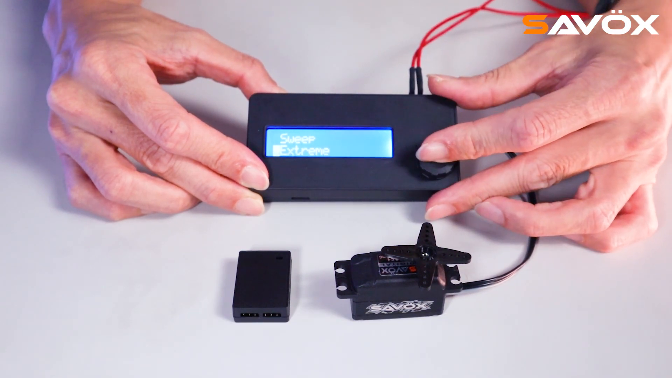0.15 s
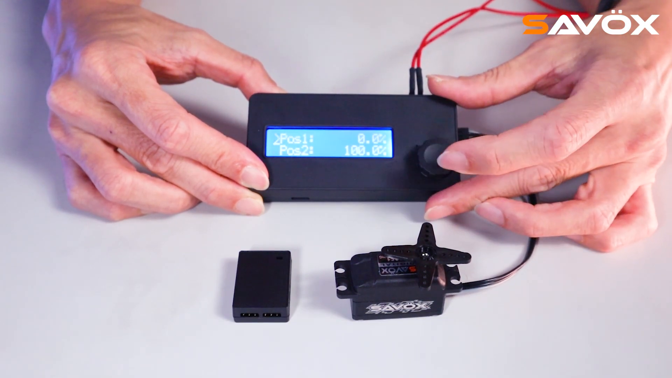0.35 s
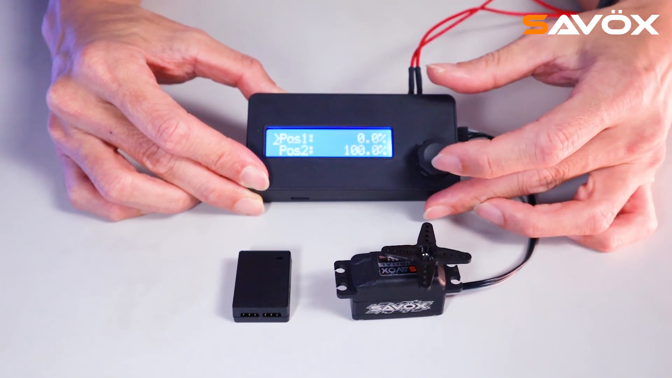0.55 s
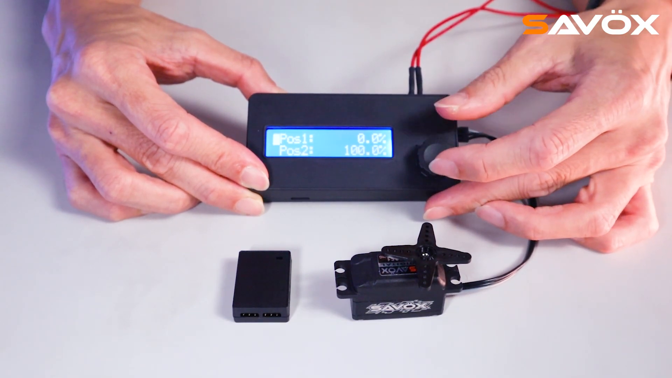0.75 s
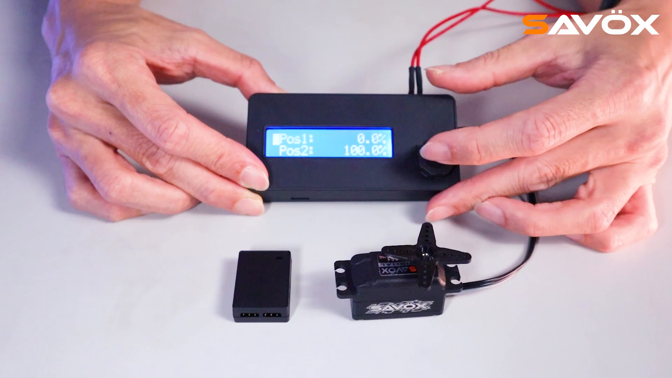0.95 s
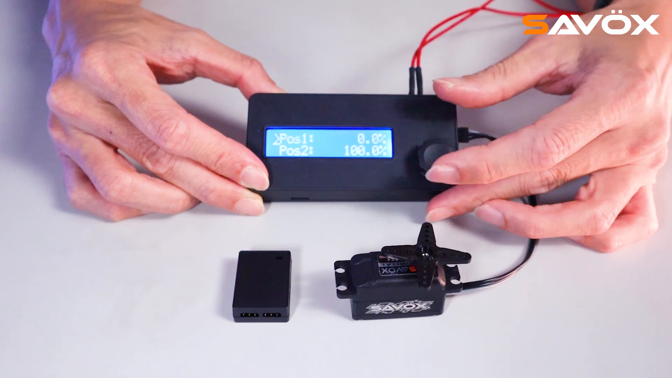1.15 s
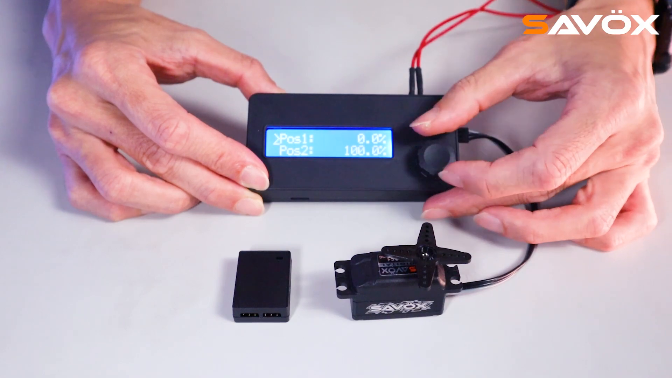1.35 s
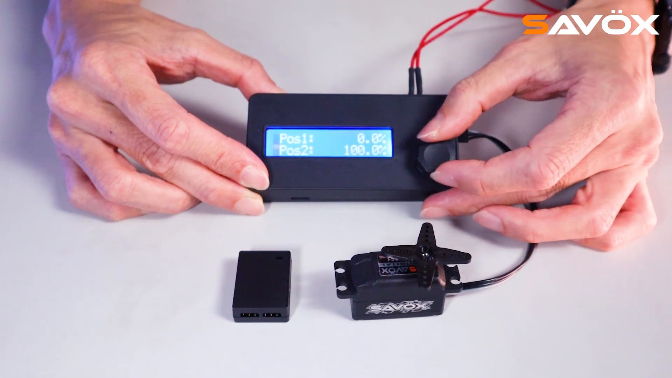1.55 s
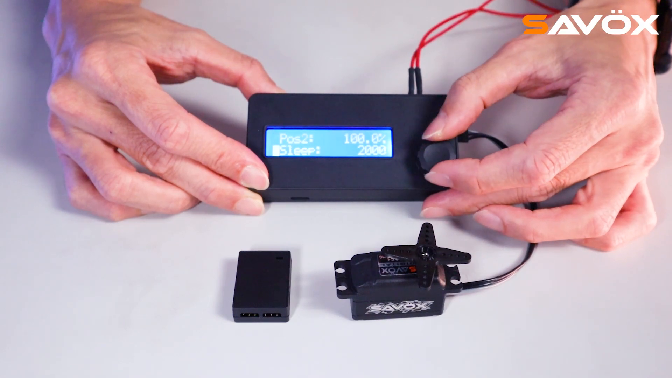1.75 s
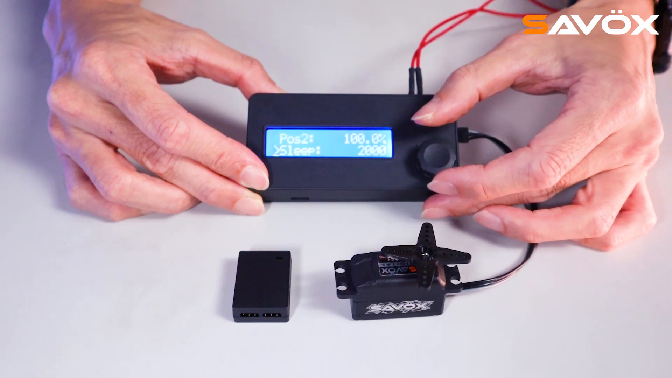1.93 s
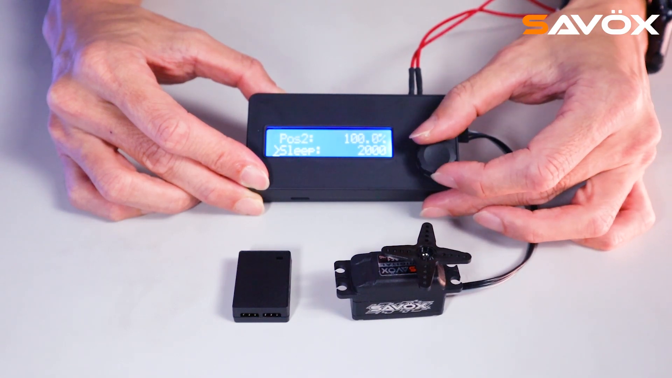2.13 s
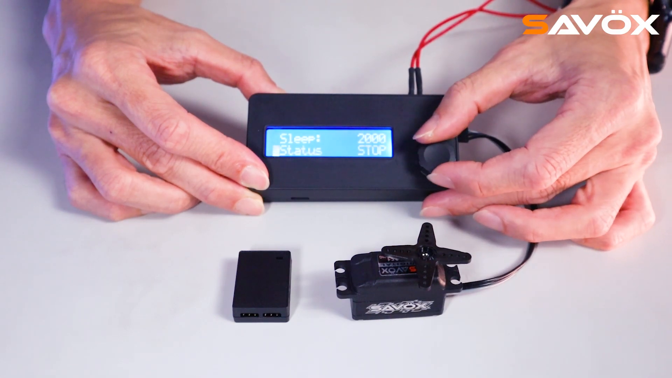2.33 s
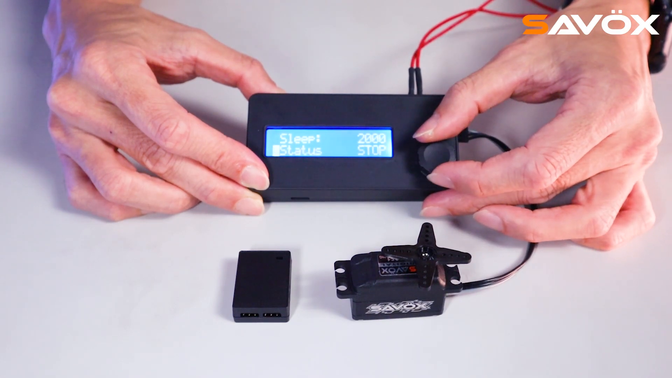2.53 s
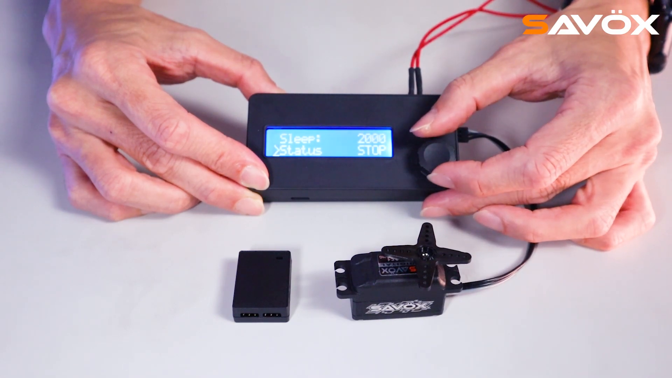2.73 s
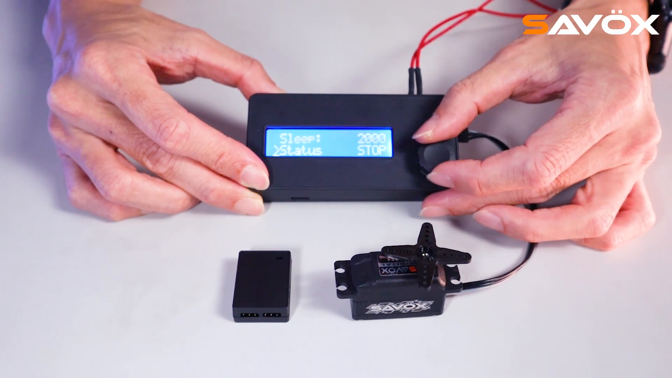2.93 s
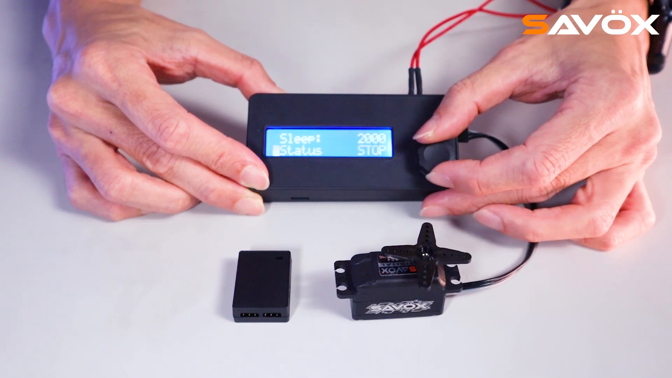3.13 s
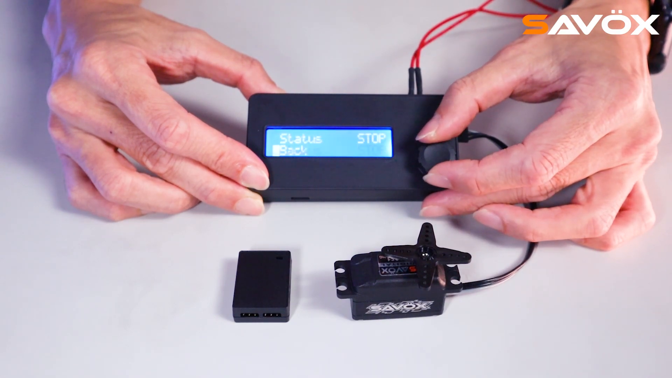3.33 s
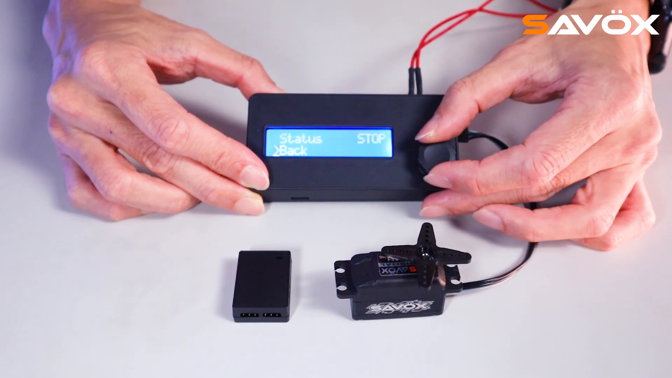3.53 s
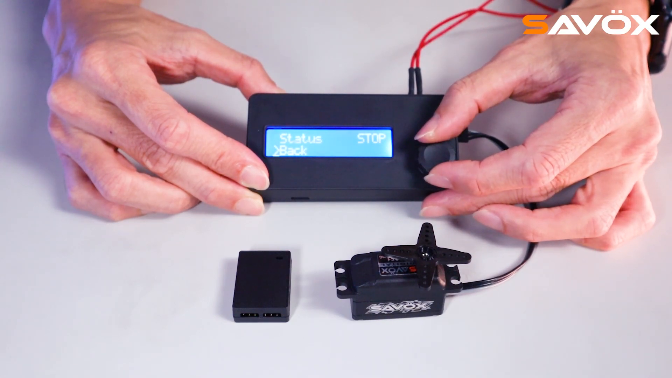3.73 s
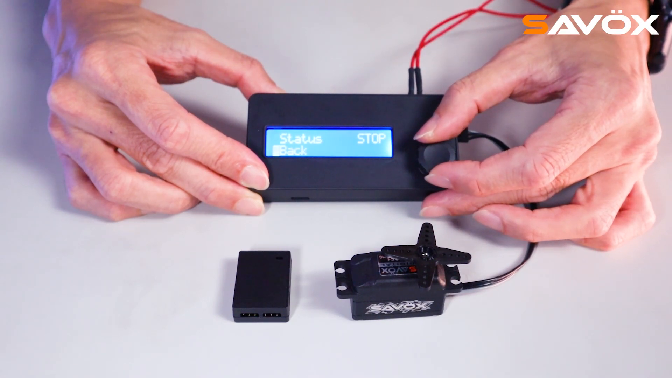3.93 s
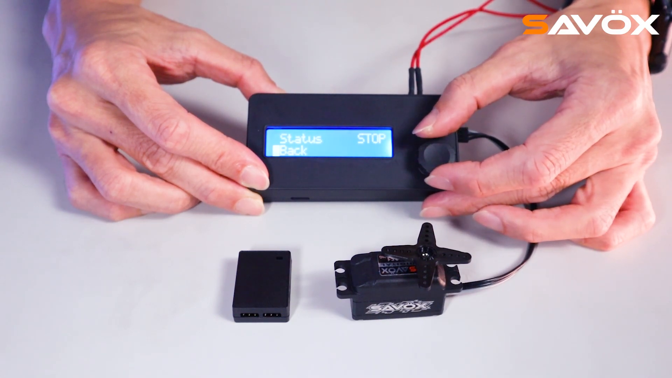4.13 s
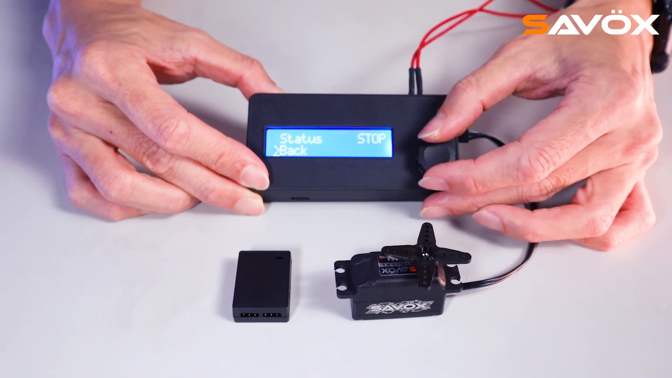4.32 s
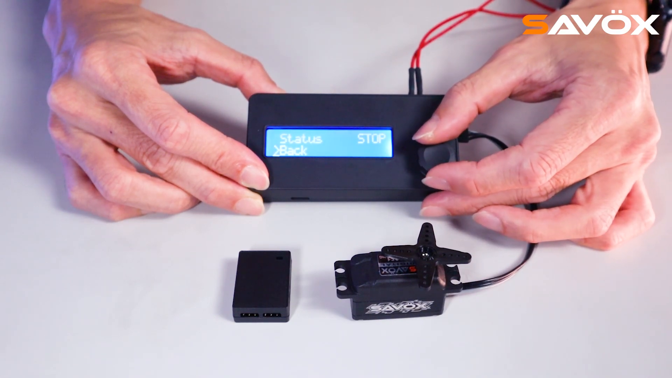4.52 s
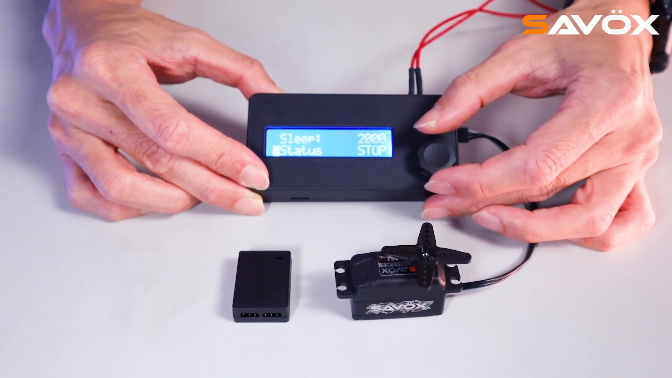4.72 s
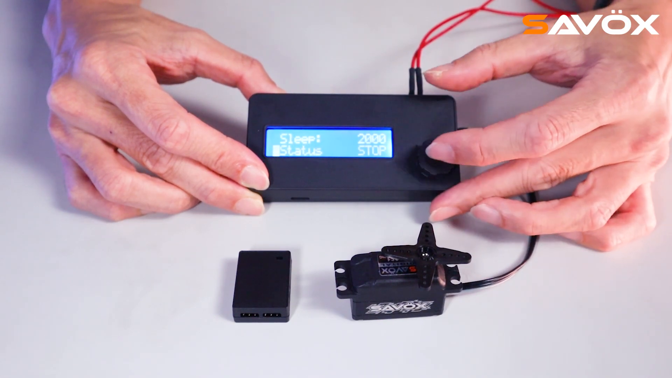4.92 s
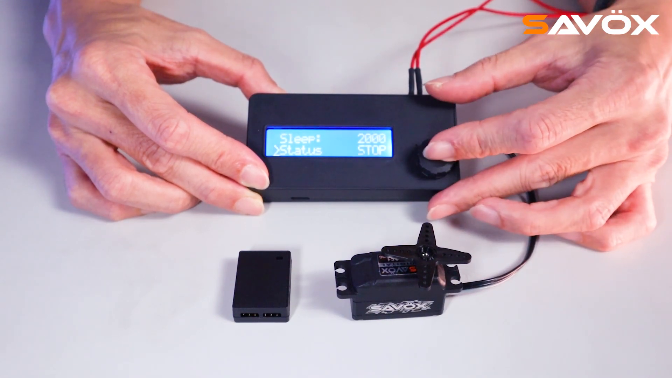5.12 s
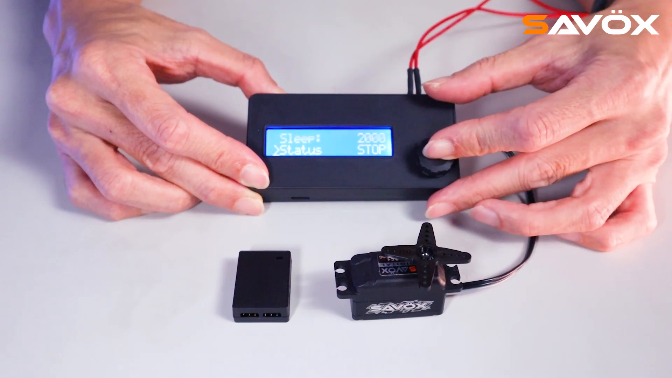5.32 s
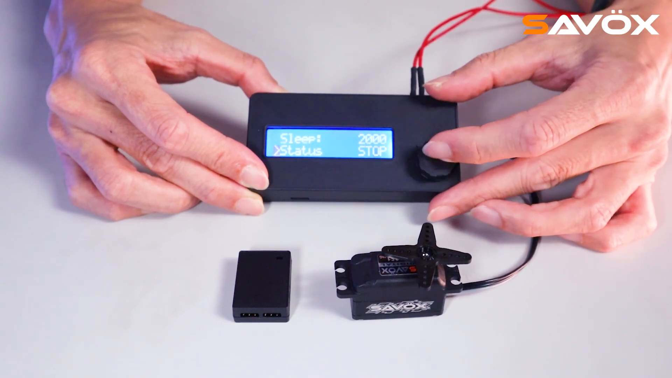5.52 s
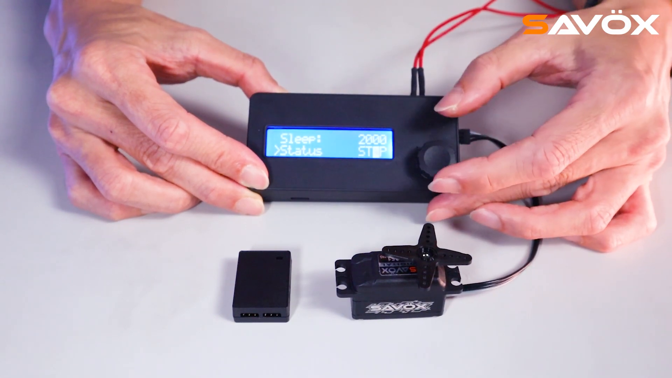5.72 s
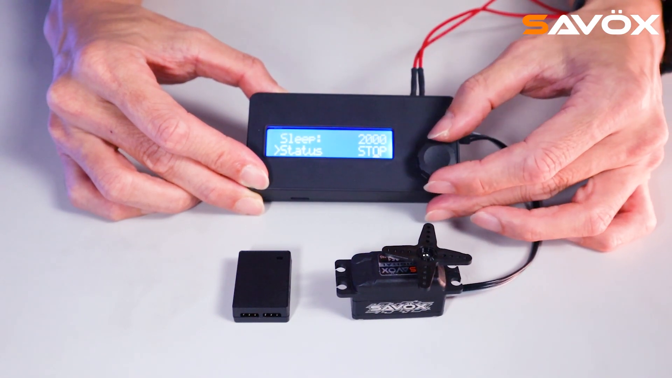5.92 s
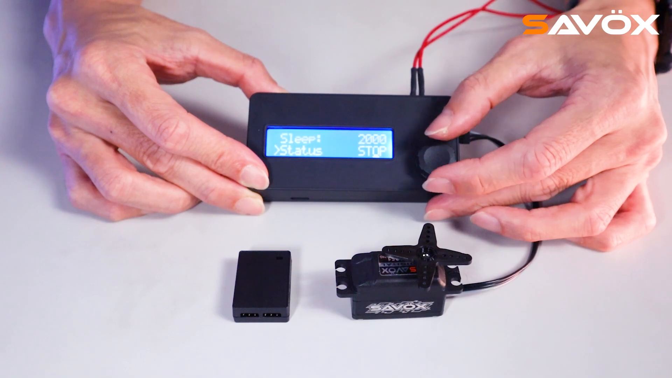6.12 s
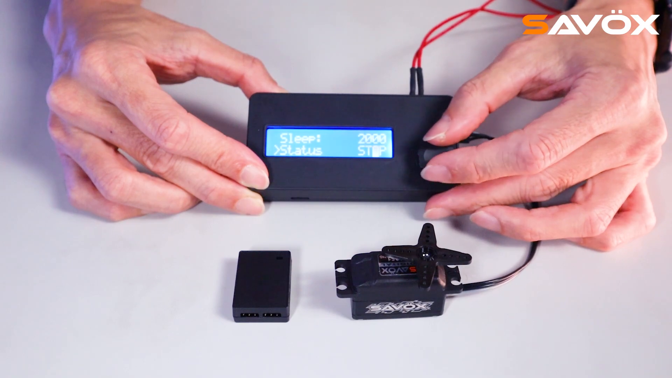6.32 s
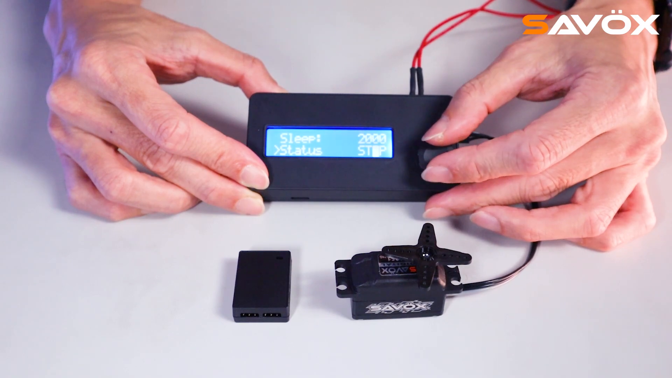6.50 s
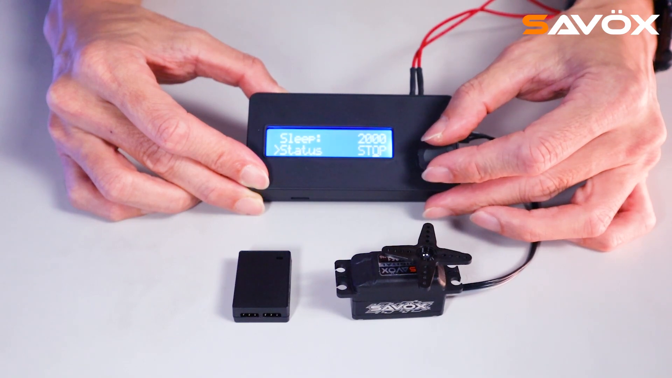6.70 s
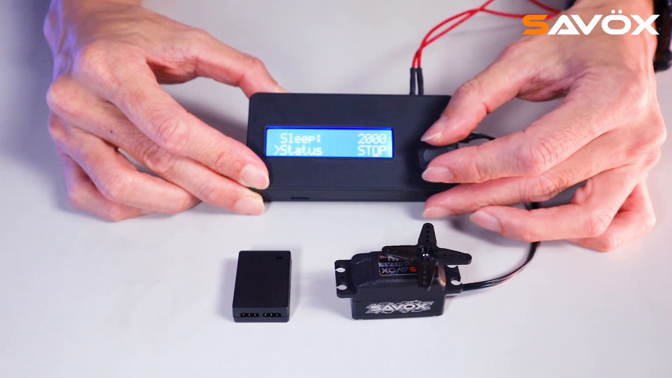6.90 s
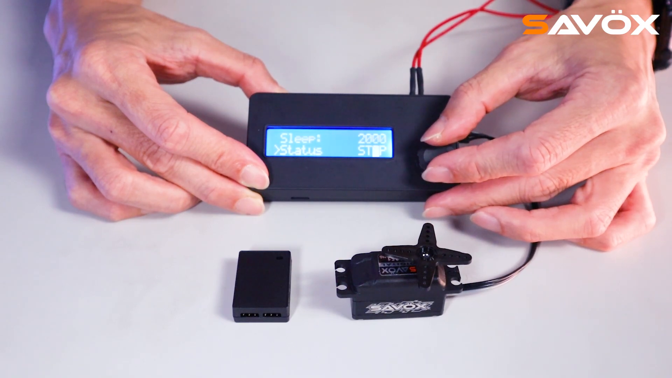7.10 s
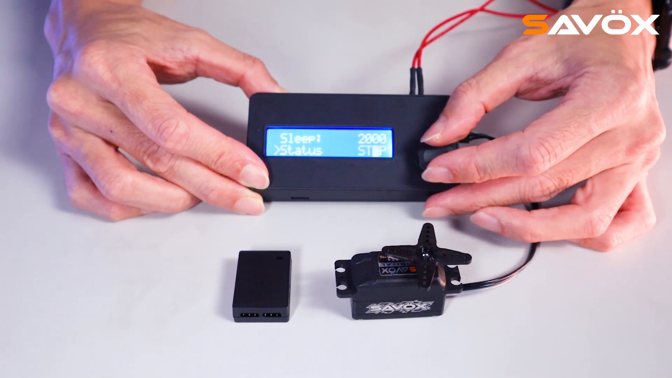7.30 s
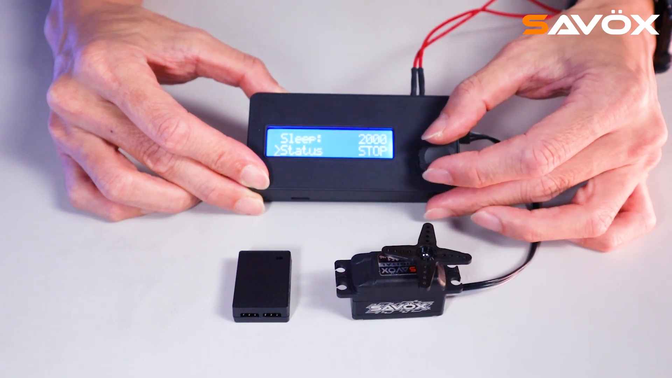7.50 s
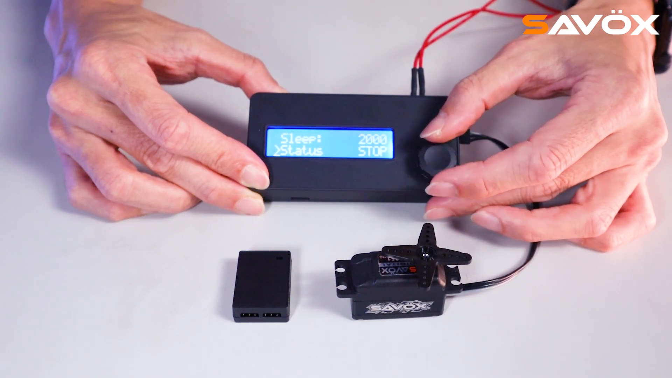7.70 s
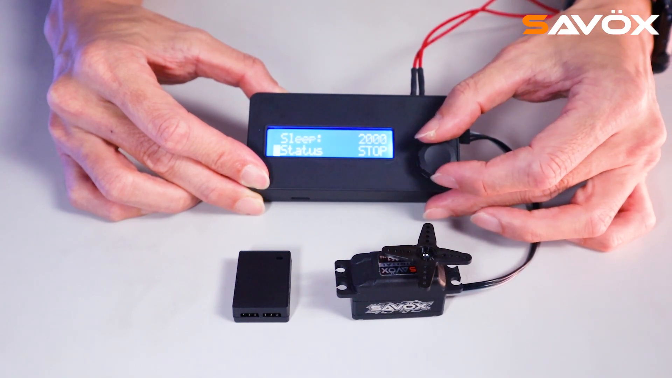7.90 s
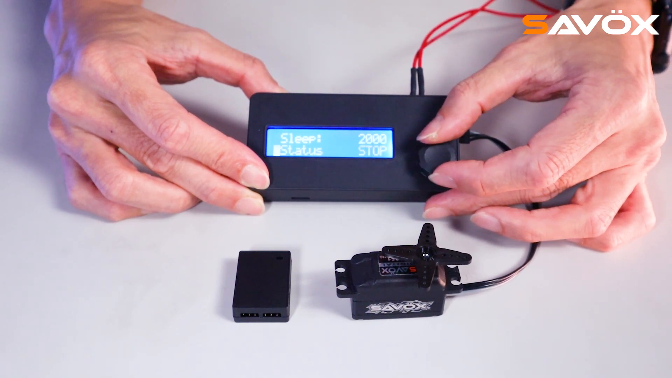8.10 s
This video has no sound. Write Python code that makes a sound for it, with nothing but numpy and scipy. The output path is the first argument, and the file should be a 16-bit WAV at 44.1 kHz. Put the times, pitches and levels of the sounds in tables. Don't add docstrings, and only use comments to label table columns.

```python
import sys
import numpy as np
from scipy import signal
from scipy.fft import rfft, irfft, next_fast_len
from scipy.io import wavfile
from scipy.ndimage import uniform_filter1d, map_coordinates

SR = 44100
rng = np.random.default_rng(int(sys.argv[2]) if len(sys.argv) > 2 else 0)


def to_wav(s):
    ch = np.atleast_2d(s).T
    pcm = np.round(np.clip(ch, -1, 1) * 32767)
    wavfile.write(sys.argv[1], SR, pcm.astype(np.int16))


def elevation(decibels):
    levels = np.asarray(decibels, float)
    return 10 ** (levels / 20)


N = 359415

# (frequency [Hz], density [dB per Hz])
HUM_SPECTRUM = [(12, -63), (20, -30.5), (54, -20), (63, -16), (80, -11), (113, -6), (185, -5), (251, -3),
                (289, -1), (327, -4), (348, -5), (381, -4.5), (431, -7.5), (552, -22.5), (800, -23),
                (1040, -56.5), (1760, -120)]
# (frequency [Hz], density [dB per Hz])
HISS_SPECTRUM = [(260, -31), (450, 0.5), (471, -8), (634, -15.5), (976, -11.5), (1100, -16.5),
                 (1620, -27.5), (2020, -31), (2460, -31), (2810, -42), (3310, -39.5), (4010, -42),
                 (5170, -46), (12750, -46.5), (12900, -61), (15800, -69.5)]
# (frequency [Hz], bandwidth [Hz], level [dB])
FAN_TONES = [(225.9, 11, -69.5), (296.3, 33, -62.5), (336.7, 6, -66.5), (357.1, 6.4, -59.5), (424, 16, -75),
             (937.6, 13, -86), (12500, 40, -113)]
# (peak time [s], length [s], level [dB])
DUCT_SURGES = [(.26, .1, -64.5), (.45, .08, -74), (.66, 0.054, -62), (.85, 0.088, -65.5),
               (1.254, .2, -63.5), (1.54, 0.11, -61.5), (1.803, 0.089, -67), (1.98, .07, -65),
               (2.137, 0.06, -60.5), (2.3, .2, -67), (2.6, .25, -68), (2.92, .22, -62), (3.18, 0.051, -66),
               (3.45, .08, -65), (3.7, .1, -62.5), (4.15, .08, -68), (4.5, 0.09, -69), (4.757, .1, -62),
               (4.997, 0.1, -62.5), (5.325, 0.043, -66), (5.537, 0.091, -66.5), (5.92, 0.13, -60),
               (6.124, .1, -60.5), (6.27, .06, -69), (7.17, .2, -59), (7.65, 0.19, -66.5),
               (7.99, .1, -61.5)]
# (frequency [Hz], ring [ms], press [dB], release [dB], detent [dB])
BOX_MODES = [(361.4, 6.2, -13, 2, -26), (584, 10, -27.5, -10, -27), (872.5, 11, -12, -1.5, -13),
             (1106, 6.9, -3, 3.5, 1.5), (1294, 12, -9, -9, -6.5), (1594, 9.4, -15.5, -12.5, -9.5),
             (1950, 8, -6, -14.5, -10), (2260, 6.5, -14, -21.5, -14), (2760, 3.9, -6.5, -6, -0.5),
             (3310, 11, -17.5, -17, -11.5), (3676, 6.4, -12, -7, -16), (4220, 4.9, -23.5, -25, -18),
             (4850, 4, -27.5, -23.5, -22), (5563, 4, -28, -21.5, -20.5)]
# (frequency [Hz], ring [ms], press [dB], release [dB], detent [dB])
CAP_MODES = [(6320, 4, -31, -17, -18), (7003, 4, -30.5, -24, -27), (7503, 4.6, -41, -34, -23.5),
             (8320, 6.3, -32, -26.5, -24), (9127, 3.6, -35.5, -41.5, -22), (9860, 5.2, -46.5, -29, -37.5),
             (10950, 4.6, -42.5, -39.5, -30.5), (11600, 2.8, -47, -46, -46.5), (12500, 3, -45.5, -47, -44),
             (13600, 3, -41.5, -47, -47), (14400, 3, -43.5, -46.5, -49), (15320, 3, -43, -51.5, -45)]
# (time [s], peak [dB], thump [dB], clack [dB], edge [dB])
PRESSES = [
    (0.078, -14, -25.5, -9, -12),
    (5.396, -19.5, -15, -4, -5.5),
    (7.3064, -17.5, -15.5, -7, -9),
]
# (time [s], peak [dB], thump [dB], clack [dB], edge [dB])
RELEASES = [
    (0.2652, -26.5, -25, -10.5, 8.5),
    (5.574, -30.5, -21.5, -18, -5),
    (7.5213, -31, -19.5, -17, -10),
]
# (time [s], peak [dB], clack [dB], edge [dB], tick [dB])
DETENT_STEPS = [(0.2962, -45, -8.5, 6.5, 0), (0.617, -56.5, -23, -16.5, -28.5),
                (1.472, -45.5, -31, -9, -23), (1.618, -42, -1.5, -4, -31.5), (1.718, -42, -2.5, -3.5, -24),
                (1.955, -58.5, -31, -9.5, -29), (2.311, -49.5, 4.5, -4, -20.5),
                (3.365, -39, -4.5, -7.5, -12), (3.49, -62, -27, -8, -21), (4.64, -62, -11.5, -12, -16.5),
                (5.063, -56, -15, -20, -35), (5.614, -38, -31.5, -18, -34)]
# (frequency [Hz], t60 [s], level [dB])
WALL_DECAY = [(60, .3, -30.5), (298.9, 0.29, 5), (790, .3, -2.5), (1200, 0.6, -7), (1700, 0.25, -5.5),
              (2800, .3, -11), (5500, 0.42, -9), (10000, .15, -10)]
# (delay [ms], level [dB])
NEAR_ECHOES = [
    (10, -24.5),
    (16.5, -25),
    (23, -29.5),
]
# (frequency [Hz], density [dB per Hz])
DRAG_SPECTRUM = [(700, -26), (1250, 3), (2100, -6), (3100, -2.5), (4400, -3.5), (5400, -12), (7000, -26.5),
                 (9000, -60)]
# (frequency [Hz], density [dB per Hz])
SWISH_SPECTRUM = [(3500, -38), (5000, -2.5), (5500, -2.5), (8000, -7), (11000, -18.5), (13000, -30.5),
                  (15000, -66)]
# (fastest time [s], speeding up [s], slowing down [s], drag [dB], swish over drag [dB])
FINGER_STROKES = [(.29, 0.021, .13, -74.5, -5.5), (1.5, 0.16, .1, -90, -6), (3.0, 0.17, 0.13, -87.5, -0.5),
                  (3.76, 0.16, 0.11, -74, -6.5), (4.5, 0.24, .2, -87, -7), (4.95, .08, 0.085, -84, -7),
                  (5.18, 0.1, 0.047, -84.5, -6), (5.579, 0.11, .12, -76, -9.5), (5.9, 0.22, 0.32, -82, -8),
                  (6.67, .14, 0.1, -84.5, -7.5), (7.26, 0.065, 0.088, -80, -8),
                  (7.41, 0.044, 0.12, -76, -13), (7.85, 0.35, .2, -84, -6)]
# (time [s], peak [dB], frequency [Hz])
FINGER_TAPS = [
    (0.923, -64, 940),
    (5.0637, -62, 1010),
    (5.651, -56, 1140),
    (5.7936, -54.5, 1150),
]
# (peak time [s], rise [s], fall [s], level [dB])
WHINE_SWELLS = [
    (4.6, .2, .3, -98),
    (7.4, .1, 0.14, -91),
]

DOWN, UP, TURN = range(3)


def unit(x):
    return x / np.sqrt(np.mean(x ** 2) + 1e-20)


def along(points, hz):
    f, v = np.transpose(points)
    return np.interp(np.log(hz + 1), np.log(f + 1), v)


def noise(gain):
    m = next_fast_len(N + 8192)
    spectrum = rfft(rng.standard_normal(m)) * gain(np.fft.rfftfreq(m, 1 / SR))
    return unit(irfft(spectrum, m)[:N])


def shaped_noise(spectrum):
    return noise(lambda f: elevation(along(spectrum, f)))


def narrow(hz, width_hz):
    return noise(lambda f: 1 / (1 + ((f - hz) / width_hz * 2) ** 2))


def wobble(rate):
    knots = rng.standard_normal(int(N * rate / SR) + 4)
    return map_coordinates(knots, [np.arange(N) * rate / SR])


def swell(s, rise_s, fall_s, db):
    t = np.arange(N) / SR - s
    return elevation(db) ** 2 * np.exp(-(t / np.where(t < 0, rise_s, fall_s)) ** 2)


def ventilation():
    tones = sum(elevation(db + 54.5 + 1.2 * wobble(5.6)) * narrow(hz, width) for hz, width, db in FAN_TONES)
    hum_db = -55 + 0.62 * wobble(2.6) + 2.1 * wobble(11)
    hum = elevation(hum_db) * (elevation(-2.0) * shaped_noise(HUM_SPECTRUM) + tones)

    duct_hz = 89 + 4 * wobble(9.1)
    surges = sum(swell(s, length / 2, length / 2, db) for s, length, db in DUCT_SURGES)
    between = elevation(-78 + 2.5 * wobble(10)) ** 2
    throb = np.sqrt(2 * surges + 2 * between) * np.sin(2 * np.pi * np.cumsum(duct_hz) / SR)
    return hum + throb + elevation(-68) * shaped_noise(HISS_SPECTRUM)


def room(click):
    power = np.abs(rfft(click)) ** 2
    for _ in range(2):
        power = uniform_filter1d(power, size=35)
    blurred = np.roll(irfft(np.sqrt(np.abs(power))), 128)[:256]

    hz, t, z = signal.stft(rng.standard_normal(SR // 2), SR, nperseg=256)
    t60, db = (along(np.array(WALL_DECAY)[:, [0, k]], hz)[:, None] for k in (1, 2))
    fading = elevation(db - 60 * t / t60)
    tail = signal.istft(z * fading, SR, nperseg=256)[1]
    tail_t = np.arange(len(tail)) / SR
    tail = elevation(-37) * tail * (1 - np.exp(-(tail_t / 0.00087) ** 2))
    wet = signal.fftconvolve(blurred, tail)

    for ms, echo_db in NEAR_ECHOES:
        dulled = uniform_filter1d(click, size=7)
        wet[round(ms * SR / 1000):][:len(click)] += elevation(echo_db) * dulled
    return wet


def contacts(events, kind, groups_hz, lead_s, lag_ms, rise_ms, ring, sharp, after_db, free_db):
    hz, ms, *levels = np.transpose(np.concatenate([BOX_MODES, CAP_MODES]))[:, :, None]
    lag_s = lag_ms / 1000 * (hz > 2200)
    t = np.clip(np.arange(SR // 20) / SR - lag_s, 0, None)
    sign = np.where(hz < 2200, -1, (-1.) ** np.arange(len(hz))[:, None])
    usual = np.median(events, axis=0)[2:]

    age = t * 1000 / (ring * np.minimum(ms, 2.6 + 12000 / hz))
    after = elevation(after_db - 13 * np.log2(hz / 1000)) * np.exp(-age / 1.8)
    rise = 1 - np.exp(-t * 1000 / rise_ms * np.sqrt(hz / 1500))
    knee = 1.3 + (sharp - 1.3) / (1 + (hz / 4500) ** 4)
    shape = rise * (np.exp(-age ** knee) + after)
    spring = abs(hz - 1600) < 120
    shape += rise * spring * elevation(free_db) * np.exp(-t * 1000 / 11)

    out = np.zeros(N + SR)
    for s, db, *colour in events:
        strike = along(sorted([(1100, 0), *zip(groups_hz, colour - usual)]), hz)
        scatter = rng.standard_normal((2, len(hz), 1))
        phase = np.where(hz < 4500, .3, 1.5) * scatter[0]
        swing = sign * np.sin(2 * np.pi * hz * t + phase)
        level_db = db + levels[kind] + strike + 1.0 * scatter[1]
        click = np.sum(elevation(level_db) * shape * swing, axis=0)
        wet = room(click)
        at = round((s - lead_s) * SR)
        out[at:at + len(click)] += click
        out[at:at + len(wet)] += wet
    return out[:N]


def knob():
    switch_hz, spring_hz = [400, 2000, 3500], [2000, 3500, 7000]
    down = contacts(PRESSES, DOWN, switch_hz, lead_s=.0013, lag_ms=.05, rise_ms=0.85,
                    ring=0.59, sharp=5.2, free_db=-22, after_db=-15.5)
    up = contacts(RELEASES, UP, switch_hz, lead_s=.0009, lag_ms=.7, rise_ms=1.1,
                  ring=0.6, sharp=2.17, free_db=-22, after_db=-16)
    turn = contacts(DETENT_STEPS, TURN, spring_hz, lead_s=.0007, lag_ms=.05, rise_ms=0.56,
                    ring=0.43, sharp=1.1, free_db=-9, after_db=-16.5)
    return down + up + turn


def fingers():
    slow = elevation(-88) ** 2 + sum(swell(s, up, down, db) for s, up, down, db, _ in FINGER_STROKES)
    fast = elevation(-97) ** 2 + sum(swell(s, up, down, db + bright_db)
                               for s, up, down, db, bright_db in FINGER_STROKES)
    drag = 1.525 * shaped_noise(DRAG_SPECTRUM)
    swish = 1.7 * shaped_noise(SWISH_SPECTRUM)
    return np.sqrt(slow) * drag + np.sqrt(fast) * swish


def taps():
    out = np.zeros(N + SR)
    t = np.arange(SR // 30) / SR
    for s, db, hz in FINGER_TAPS:
        envelope = elevation(db + 18.5) * t / 0.0026 * np.exp(-t / 0.0015)
        out[round((s - .002) * SR):][:len(t)] += envelope * np.sin(2 * np.pi * hz * t)
    return out[:N]


def whine():
    power = sum(swell(*row) for row in WHINE_SWELLS)
    return np.sqrt(power) * narrow(10950, width_hz=700)


def scene():
    return (ventilation() + knob() + fingers() + taps() + whine())[None]


def roll_off(x):
    return signal.sosfilt(signal.butter(12, 15940, fs=SR, output="sos"), x)


def record(dry):
    cut = signal.butter(2, 38, "highpass", fs=SR, output="sos")
    mix = signal.sosfilt(cut, dry)
    return roll_off(mix)


dry = scene()
out = record(dry)
to_wav(out)
```